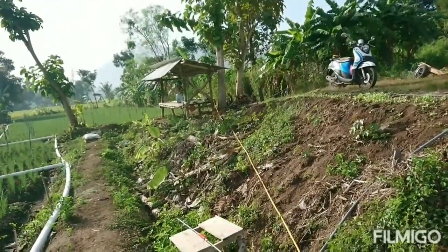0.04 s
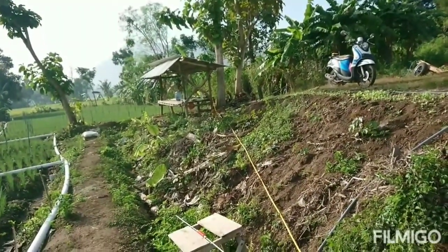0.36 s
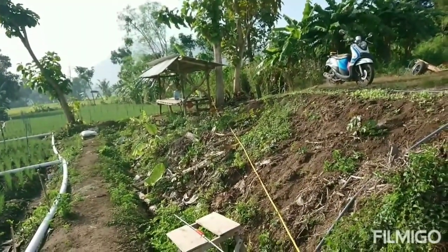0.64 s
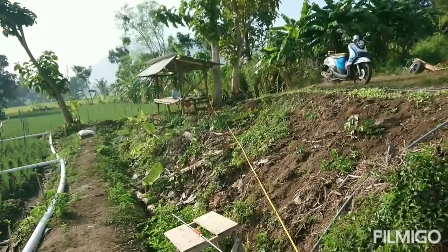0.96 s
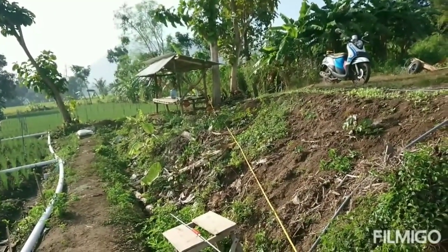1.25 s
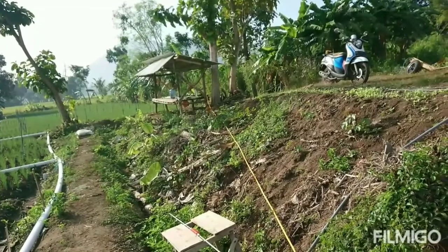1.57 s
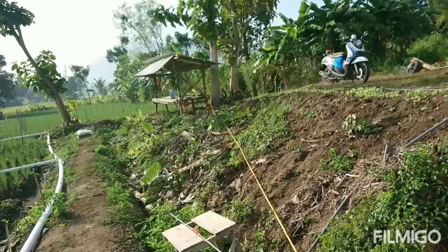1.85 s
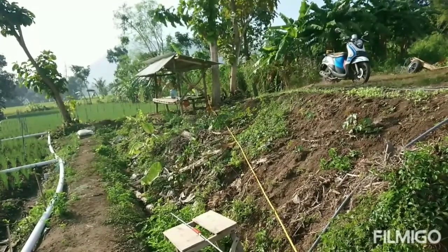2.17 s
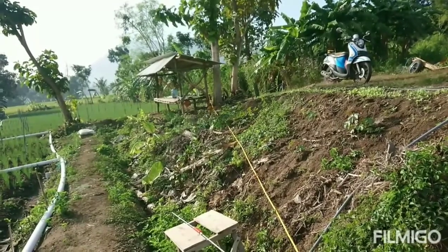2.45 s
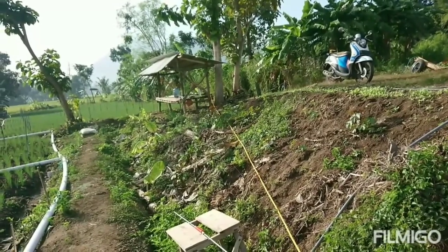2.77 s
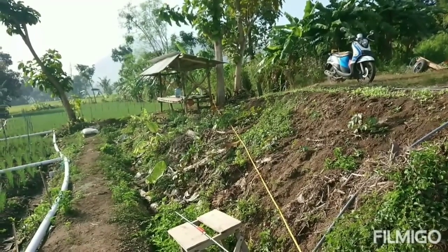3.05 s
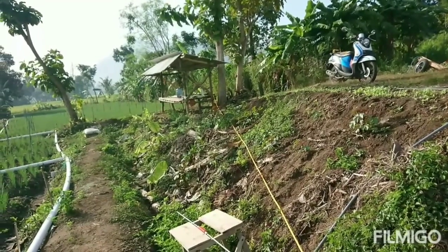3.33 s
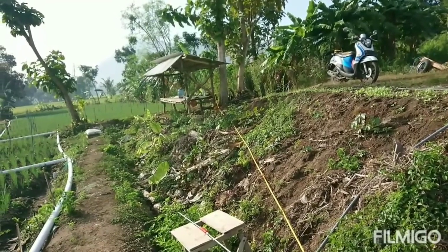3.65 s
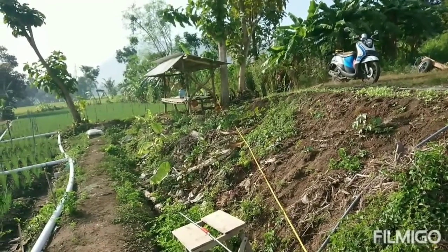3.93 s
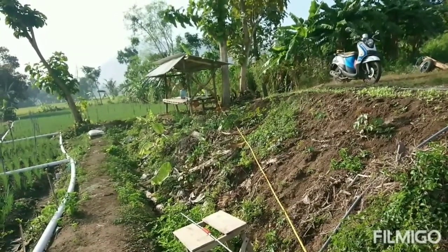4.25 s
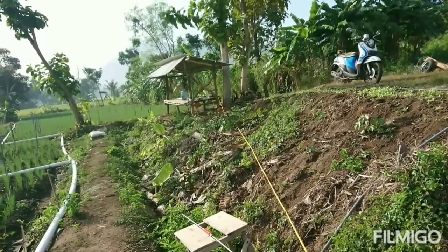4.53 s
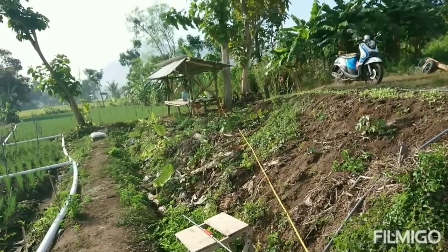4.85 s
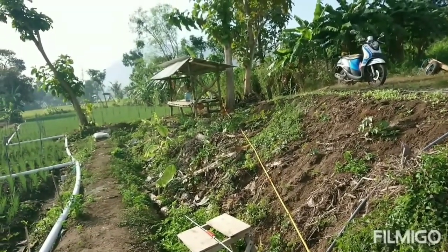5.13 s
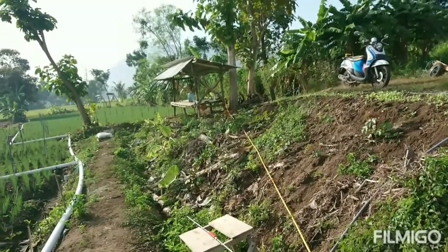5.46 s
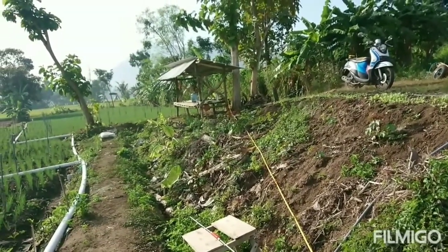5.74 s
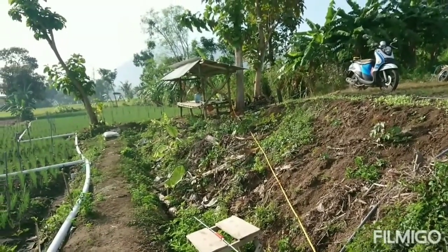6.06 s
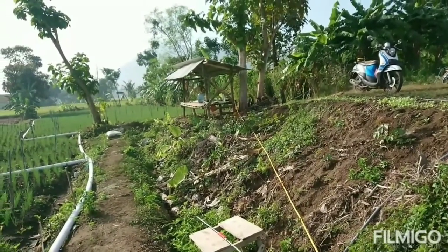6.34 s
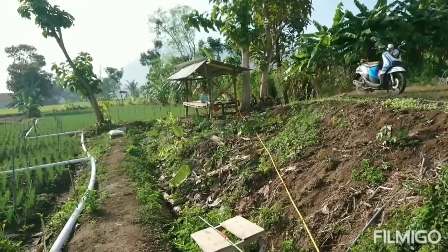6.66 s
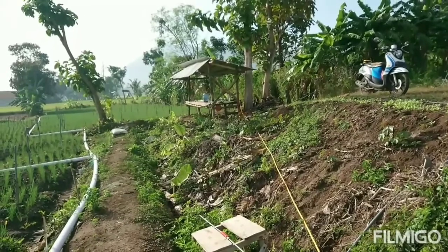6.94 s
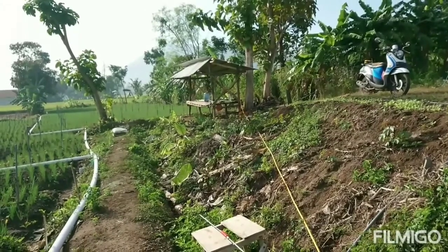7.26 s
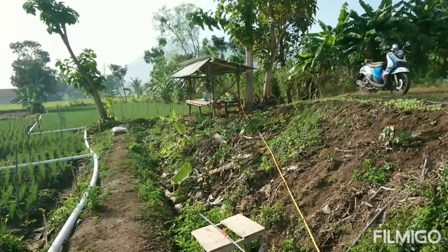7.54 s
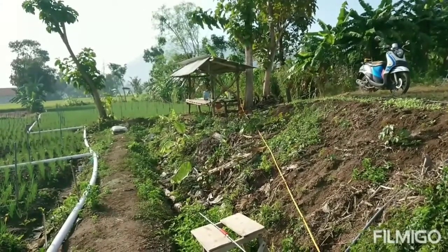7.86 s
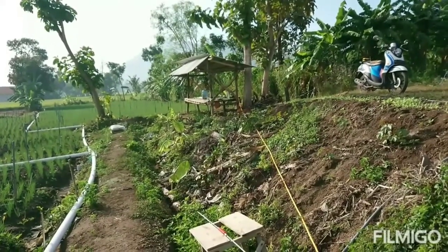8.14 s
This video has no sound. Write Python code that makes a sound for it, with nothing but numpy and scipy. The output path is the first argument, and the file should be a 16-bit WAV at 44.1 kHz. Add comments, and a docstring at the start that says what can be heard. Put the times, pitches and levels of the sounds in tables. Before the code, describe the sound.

A low outdoor rumble and a soft, even hiss run throughout, with distant birds giving short slurred whistles and tiny high chips. From about 0.5 seconds a small metal ratchet is worked close to the microphone: eight strokes, roughly 0.7 seconds apart, the last near 5.5 seconds. Each is a sharp click followed by the clack of the lever, a brief rattle and a thin, high buzz from the spring. The hardest clicks fall near 1.9 and 2.5 seconds. A steel catch snaps brightly on some strokes, loudest at 4.8 seconds. A faint, far engine hums from about 1.5 seconds. After another clack at 6 seconds, the slack lever taps, rubs and trembles quietly, the spring sings faintly, and an insect throbs far off. A light clack comes near 6.9 seconds and a small snap near 7.4, then faint trembling lasts until about 8.4 seconds.

```python
"""A small ratchet is worked close by at the edge of a rice field. From the start there is a low rumble,
an even hiss and distant birds; a far engine soon joins in. From 0.5 s come eight strokes, each a train
of impacts exciting damped resonances: the pawl clicks over a tooth, the lever falls back with a clack,
on some strokes a steel catch snaps, and the spring buzzes on. After 6 s an insect throbs far off, while
the slack lever taps and trembles and the freed spring sings."""
import sys
import numpy as np
from scipy import signal
from scipy.fft import rfft, irfft, next_fast_len
from scipy.io import wavfile
from scipy.ndimage import uniform_filter1d

SR = 44100
rng = np.random.default_rng(int(sys.argv[2]) if len(sys.argv) > 2 else 0)


def file_out(sig):
    """Save sig as 16-bit WAV at sys.argv[1]."""
    # one column per channel
    cols = np.atleast_2d(sig).T
    # limit, then scale
    lim = np.clip(cols, -1, 1)
    pcm = np.round(lim * 32767).astype(np.int16)
    wavfile.write(sys.argv[1], SR, pcm)


N = 366030
TIME = np.arange(N) / SR
HIT = SR // 2  # samples in the buffer of one impact
BOUNCE_S, RATTLE_BODY_DB = 0.013, -17  # delay of a rattle; offset of the housing's part in it
SPRING_HZ, SPRING_S = 10990, 0.12

# modes of the housing: (frequency [Hz], bandwidth [Hz], level [dB])
HOUSING_MODES = [(1237, 50, 5), (1316, 68, 1), (1420, 68, -7), (1516, 48.4, -1.5), (1840, 67, 0),
                 (1895, 65, 11), (2310, 45, 6), (3100, 58, -2), (3480, 90, -1.5), (4310, 60, -5)]
# spectrum of a click's contact noise: (frequency [Hz], level [dB])
CLICK_SPECTRUM = [(400, 1.5), (900, -3.5), (1700, -2), (3000, -26.5), (5000, 10.5), (10000, 3),
                  (12000, 6.5), (14300, 11.5), (16000, -25.5)]


def undb(db):
    """Amplitude ratio of a level in decibels."""
    return 10 ** (np.asarray(db) / 20)


def lookup(points, hz):
    """Interpolation of (frequency [Hz], value) points on a logarithmic frequency axis."""
    f, value = np.transpose(points)
    return np.interp(np.log(np.maximum(hz, 1)), np.log(f), value)


def unit(x, seconds):
    """Normalisation to rms 1 over the first seconds."""
    return x / np.sqrt(np.mean(x[..., :int(seconds * SR)] ** 2))


def add(out, s, x):
    """Superposition: x is added to out from time s on."""
    i = max(int(s * SR), 0)
    out[:, i:i + x.shape[-1]] += x[..., :N - i]


def walk(rate, size=N):
    """Smoothed random modulation with rate new values a second and a spread near 1."""
    k = max(int(SR / rate), 1)
    return 1.098 * uniform_filter1d(np.repeat(rng.standard_normal(size // k + 1), k), k)[:size]


def colour(x, points, size=512):
    """Minimum-phase filter with the response (frequency [Hz], gain [dB]), by cepstral folding."""
    cepstrum = irfft(np.log(undb(lookup(points, np.fft.rfftfreq(size, 1 / SR)))))
    cepstrum[1:size // 2] *= 2
    cepstrum[size // 2 + 1:] = 0
    response = irfft(np.exp(rfft(cepstrum)))
    return signal.fftconvolve(x, response[None], axes=1)[:, :x.shape[1]]


def ring(x, modes, spread_db=0, detune=0):
    """Modal superposition: striking point and load vary the weights and pitch of damped modes at random."""
    stretch = 1 + np.clip(detune * rng.standard_normal(), -.1, .1)
    offsets_db = spread_db * rng.standard_normal(len(modes))
    return sum(undb(db + offset) * signal.lfilter(*signal.iirpeak(hz * stretch, hz / width, fs=SR), x)
               for (hz, width, db), offset in zip(modes, offsets_db))


def contact(t60, rise, coherence):
    """Many tiny collisions sum to exponentially decaying noise, partly coherent between the channels."""
    t = np.arange(HIT) / SR
    shared = np.sqrt(coherence) * rng.standard_normal(HIT)
    diffuse = np.sqrt(1 - coherence) * rng.standard_normal((2, HIT))
    return (shared + diffuse) * np.minimum(t / rise, 1) * undb(-60 * t / t60)


def air_levels():
    """Level envelopes [dB] of the background's rumble, middle, hiss and top band."""
    # slow course of the rumble and of the middle: (time [s], level [dB])
    rumble = [(0, -1), (4.1, 0.5), (4.7, -1), (6.3, -2), (7.5, -1.5), (8.1, 2)]
    middle = [(0, 1), (2, 3), (5.8, 0.5), (6.3, -1.5), (7.6, -3.5), (8.3, -1)]
    # brief dips of the middle: (time [s], duration [s], level [dB])
    dips = [(5.24, 0.11, -14), (5.32, 0.083, -14), (6.085, 0.096, -6), (6.156, 0.11, -15),
            (6.27, 0.076, -7), (6.38, 0.075, -7), (7.077, 0.066, -5.5), (7.17, 0.1685, -9),
            (7.367, 0.17, -4), (7.556, 0.12, -6), (7.685, 0.085, -4), (7.845, 0.044, -2)]
    # course of the treble: (time [s], hiss level [dB], top level [dB])
    treble = [(0.0, -61.5, -69), (1.2, -64, -70), (1.57, -62, -69), (4.51, -63, -68.5), (4.76, -62, -65),
              (5.18, -64, -76), (5.69, -60.5, -68), (6.06, -67.5, -99), (6.26, -62, -80),
              (6.38, -61, -71.5), (6.75, -69.5, -105), (7.2, -65, -91), (7.5, -62.5, -76),
              (7.86, -68.5, -102), (8.3, -68.5, -93)]
    hiss_ref_db, top_ref_db = -64, -72.5
    rumble_db = np.interp(TIME, *np.transpose(rumble))
    middle_db = np.interp(TIME, *np.transpose(middle))
    for s, length, db in dips:
        add(middle_db[None], s, db * signal.windows.tukey(int(length * SR), .5))
    times, hiss, top = np.transpose(treble)
    hiss_db = np.interp(TIME, times, hiss) - hiss_ref_db
    top_db = np.interp(TIME, times, top) - top_ref_db
    return rumble_db, middle_db, hiss_db, top_db


def air():
    """Partly coherent noise: rumble alike on both sides and diffuse hiss, modulated band by band."""
    # outdoor noise: (frequency [Hz], spectral density [dB/Hz])
    density = [(20, -111), (35, -82), (56, -67.5), (85, -69.5), (120, -77.5), (170, -79.5), (280, -87.5),
               (400, -95.5), (600, -103), (900, -99), (1300, -99), (1900, -103), (3600, -96.5),
               (7500, -98.5), (10500, -102), (12000, -106), (14500, -105), (16000, -118)]
    # its balance: (frequency [Hz], left minus right [dB])
    balance = [(60, 3.5), (250, 4.5), (500, 7), (900, 5), (1300, -0.5), (2700, -4), (4000, -1), (6500, 0),
               (9000, 5.5), (13000, -1.5)]
    size = next_fast_len(N)
    hz = np.fft.rfftfreq(size, 1 / SR)
    coherence = lookup([(250, 0.918), (600, 0.18), (1200, 0.63), (2500, 0.24), (8000, 0.017)], hz)
    noise = rfft(rng.standard_normal((3, size)))
    pan = undb(lookup(balance, hz) * np.array([[.5], [-.5]]))
    shared = noise[2] * np.exp(-2j * np.pi * hz * np.array([[.00014], [0]]))  # arrives later on the left
    white = np.sqrt(coherence) * shared + np.sqrt(1 - coherence) * noise[:2]
    spectrum = white * pan * undb(lookup(density, hz) - 3) * np.sqrt(SR / 2)
    rumble_db, middle_db, hiss_db, top_db = air_levels()
    centres = [40, 80, 160, 280, 430, 580, 780, 1020, 1320, 1680, 2120, 2700, 3500, 5500, 8000,
               11000, 12500]
    # how strongly a band follows each level change: (frequency [Hz], slope [dB/dB])
    middle_slope = [(160, 0.11), (430, 0.6), (650, 2), (1000, 1.7), (1500, 1.1), (2300, 0.75), (4500, 0)]
    hiss_slope = [(1280, 0.262), (2560, 1.213), (5120, 1.03), (10240, 1.76)]
    flicker_slope = [(2300, 0.4), (3500, 0.58), (8000, 0.39), (12500, 0.46)]
    out = 0
    for centre, weights in zip(centres, np.eye(len(centres))):
        band = irfft(spectrum * lookup(np.transpose([centres, weights]), hz), size)[:, :N]
        db = middle_db * lookup(middle_slope, centre) + rumble_db * (centre < 100)
        db += top_db if centre == centres[-1] else hiss_db * lookup(hiss_slope, centre)
        # a band flickers more as its level shifts, above all where the middle thins
        flicker_db = lookup([(100, 1.33), (1000, 1.44), (5000, 2.02)], centre)
        flicker_db += 0.077 * abs(db) * lookup(flicker_slope, centre)
        flicker_db += 1.46 * np.clip(-middle_db, 0, 2) * (500 < centre < 3000)
        out = out + band * undb(db + flicker_db * walk(16))
    return out


def drones():
    """Random frequency and amplitude modulation broadens the tones of a far engine and an insect."""
    # (time [s], duration [s], frequency [Hz], bandwidth [Hz], flutter [dB], level [dB])
    far_tones = [(1.4, 1.86, 175, 6.3, 1, -68), (1.5, 1.35, 212, 10, 0.5, -72),
                 (2.852, 1.06, 230.6, 13.4, 2, -62.5), (3.4, 1.08, 159.9, 9.01, 0.5, -58),
                 (3.421, 4.454, 430.2, 85, 1.5, -77.5), (3.5, 6, 156.7, 9, 1, -70),
                 (4.198, 0.24, 1611, 39, 4, -73), (4.932, 0.23, 1730, 35, 4, -78),
                 (6.101, 2.8, 4300, 62, 2, -78)]
    pan = np.array([[1.15], [.85]])
    out = np.zeros((2, N))
    for s, length, hz, width, flutter_db, db in far_tones:
        n = int(length * SR)
        phase = 2 * np.pi * np.cumsum(hz + .5 * width * walk(2 * width)[:n]) / SR
        tone = np.sin(phase) * undb(flutter_db * walk(18)[:n]) * signal.windows.tukey(n, .7)
        add(out, s, undb(db + 2.5) * tone * pan)
    return out


def whistle(hz, db):
    """A frequency-modulated sine: one note that wavers and flutters along a pitch path."""
    u = np.linspace(0, 1, len(hz))
    waver = 1 + .012 * walk(300, size=len(u)) + .004 * walk(70, size=len(u))
    flutter = undb(2.2 * walk(90, size=len(u)) - 1)
    swell = np.sqrt(abs(np.sin(np.pi * u ** .85)))
    return undb(db) * flutter * swell * np.sin(2 * np.pi * np.cumsum(hz * waver) / SR)


def birds():
    """Scattering by trees smears the far whistles; nearer upward chips arrive dry, in pairs."""
    # slurs that flick up, then sag: (time [s], duration [s], top frequency [Hz], sag [Hz/s], level [dB])
    slurs = [(0.176, 0.085, 3200, 3750, -64), (0.414, .09, 4300, 3680, -61.5),
             (1.448, 0.099, 4300, 3740, -58), (1.656, 0.175, 4550, 2460, -60),
             (2.264, 0.13, 4670, 2800, -68), (2.775, 0.17, 4680, 3640, -59.5),
             (3.018, 0.12, 3270, 5060, -65.5), (3.22, 0.064, 3480, 3720, -62),
             (3.343, 0.085, 4540, 3705, -57), (3.55, 0.072, 2940, 3700, -66),
             (3.602, 0.157, 4073, 1697, -64), (3.73, 0.049, 3460, 3000, -65),
             (3.773, 0.23, 4680, 3720, -62), (5.248, 0.17, 4610, 3000, -65.5),
             (6.188, 0.12, 4630, 5050, -57.5), (6.876, 0.215, 4760, 2280, -64),
             (7.6, 0.22, 4740, 2490, -61.5), (8.175, 0.124, 4190, 3750, -72)]
    # rising notes: (time [s], starting frequency [Hz], level [dB])
    rises = [(.325, 3450, -64), (.855, 3927, -60), (6.62, 3340, -77), (7.24, 3410, -65), (7.865, 3180, -68)]
    # double chips of small birds: (time [s], level [dB])
    chips = [(.395, -67), (1.59, -71), (3.681, -67.5), (4.464, -66.5), (4.976, -68.5), (5.19, -67),
             (5.962, -69.5), (6.634, -68), (7.1, -70.5), (7.15, -67.5), (7.515, -68), (7.83, -70.5),
             (7.955, -66)]
    flick_hz, flick_s, rise_hz, rise_s = 520, .009, 482, 0.067
    far, near = np.zeros((2, 2, N))
    for s, length, top_hz, sag, db in slurs:
        t = TIME[:int(length * SR)]
        add(far, s, whistle(top_hz - sag * t - flick_hz * np.exp(-t / flick_s), db))
    for when, height in rng.random((12, 2)):  # scattered slurs of farther birds
        hz = np.interp(height, [0, 1], [2800, 4700]) - 3000 * TIME[:int(.08 * SR)]
        add(far, when * (N - HIT) / SR, whistle(hz, db=-70))
    climb_hz = rise_hz * np.sin(np.pi * .62 * np.linspace(0, 1, int(rise_s * SR)))
    for s, start_hz, db in rises:
        add(far, s, whistle(start_hz + climb_hz, db))
    u = np.linspace(0, 1, int(0.0073 * SR))
    faint_chips = [(s, -72.5) for s in rng.uniform(0, (N - HIT) / SR, size=22)]
    for s, db in list(chips) + faint_chips:
        hz = 7750 * (1 + 0.03 * rng.standard_normal())
        for lag, ratio, gain_db in [(0, 0.94, 11), (rng.uniform(.014, .028), 0.95, 11.5)]:
            phase = 2 * np.pi * np.cumsum(hz * ratio * (1 + 0.15 * (u - .5))) / SR
            add(near, s + lag - .002, undb(db + gain_db) * np.sin(np.pi * u) * np.sin(phase))
    trees = contact(t60=.15, rise=.004, coherence=0)
    scattered = signal.fftconvolve(far, trees / np.sqrt(np.sum(trees ** 2)), axes=1)[:, :N]
    return near + .66 * far + .8 * scattered


def shiver(length, hz, db, width_hz=130, fade_db=13):
    """Narrow-band resonance: small contacts keep thin steel ringing in a high, beating tone."""
    n = int(length * SR)
    tone = ring(rng.standard_normal((2, n + HIT // 8)), [(hz, width_hz, 0)])
    tone = ring(tone, [(hz, 4 * width_hz, 0)])[:, -n:]
    envelope = signal.windows.tukey(n, .25) * undb(-fade_db * np.linspace(0, 1, n))
    return undb(db) * unit(tone * envelope, length)


def rattle(crack_db, housing_db, top_db=2.5, decay_s=0.033):
    """Inelastic bounces of loose parts make a fading, uneven chatter that excites the housing."""
    t = np.arange(HIT) / SR
    bounces = undb(2.5 * walk(450, size=HIT))
    envelope = np.minimum(t / 0.003, 1) * np.exp(-(t / decay_s) ** 0.88)
    chatter = rng.standard_normal((2, HIT)) * bounces * envelope
    scrape = colour(chatter, [(400, 6.5), (1000, -5.5), (3800, 2), (7500, 0.5), (10000, -2),
                              (14000, top_db), (16000, -15.5)])
    body = unit(ring(chatter, HOUSING_MODES, spread_db=4, detune=0.004), 2 * decay_s)
    return undb(crack_db + 4) * unit(scrape, 0.57 * decay_s) + undb(housing_db + 5) * body


def thump(push_s):
    """Impulse response: a short push sets the grip swinging in its low modes."""
    # (frequency [Hz], bandwidth [Hz], level [dB])
    grip_modes = [(347, 57, 6), (432, 28.5, -6.5)]
    t = np.arange(HIT) / SR
    return unit(ring(t * np.exp(-t / push_s), grip_modes), 0.0032)


def friction(length, modes):
    """Stick-slip friction: noise of uneven strength keeps a set of modes ringing; rms 1."""
    n = int(length * SR)
    noise = rng.standard_normal((3, HIT))
    slips = (noise[2] + 0.93 * noise[:2]) * undb(4.5 * walk(100, size=HIT))
    scrape = colour(ring(slips, modes, spread_db=3.5), [(700, -19), (1100, 2), (4000, 2), (9000, -11)])
    return unit(scrape[:, :n] * signal.windows.tukey(n, .4), length)


def easing():
    """Frictional excitation: the eased lever rubs and trembles on the housing; the freed spring sings."""
    # rubs and light trembles of the lever: (time [s], duration [s], level [dB])
    rubs = [(3.908, 0.03, -58.5), (5.755, 0.0285, -57), (6.266, 0.026, -67.5), (7.466, 0.045, -63),
            (7.512, 0.03, -70)]
    trembles = [(6.599, 0.31, -81), (6.971, 0.14, -76.5), (7.159, 0.129, -68), (7.521, 0.29, -79.5),
                (7.881, 0.49, -71)]
    # the modes that each excites: (frequency [Hz], bandwidth [Hz], level [dB])
    rub_modes = [(1270, 133, 0.5), (1410, 120, 5), (1864, 140, 1.5), (2490, 110, 0), (2770, 180, -7),
                 (3650, 300, -6)]
    tremble_modes = [(1202, 49, 4), (1529, 39, -6.5), (1913, 43, 9.5), (2315, 39, -6.5), (2794, 46, -6),
                     (3680, 200, -4.5)]
    # (time [s], duration [s], frequency [Hz], level [dB])
    spring_tones = [(5.717, 0.14, 10980, -61), (6.937, 0.58, 10800, -72.5), (7.368, 0.11, 10800, -61),
                    (7.916, 0.35, 10970, -79.5)]
    out = np.zeros((2, N))
    for touches, modes in [(rubs, rub_modes), (trembles, tremble_modes)]:
        for s, length, db in touches:
            add(out, s, undb(db) * friction(length, modes))
    for s, length, hz, db in spring_tones:
        add(out, s, shiver(length, hz, db, width_hz=17, fade_db=4))
    return out


def pings():
    """Damped oscillators: single loose parts tick and ring, each at its own natural frequency; the last row is
    the slack lever ringing on in its low mode near 1.16 kHz."""
    # (time [s], frequency [Hz], bandwidth [Hz], t60 [s], level [dB])
    ringing_parts = [(0.608, 13600, 300, .04, -61), (1.308, 4900, 500, .04, -50),
                     (1.5035, 10000, 8000, .006, -52), (1.913, 6300, 900, .015, -45),
                     (1.992, 13700, 400, .07, -53), (5.407, 7500, 6000, 0.0087, -51),
                     (5.556, 13600, 200, .16, -56.5), (5.668, 7800, 120, 0.12, -53),
                     (6.585, 1165, 18, .6, -68)]
    out = np.zeros((2, N))
    for s, hz, width, t60, db in ringing_parts:
        tone = ring(contact(t60, rise=.001, coherence=.3), [(hz, width, 0)])
        add(out, s, undb(db) * unit(tone, t60 / 4))
    return out


def lever_taps():
    """Free vibration: the slack lever taps and chatters in its play, ringing in its own modes."""
    # (time [s], level [dB], t60 [s])
    taps = [(6.349, -54.5, 0.1), (6.383, -69, 0.9), (6.462, -57.5, 0.3), (6.531, -57.5, 0.1),
            (6.554, -55.5, 0.28), (6.59, -57, 0.23), (6.955, -66, 0.44)]
    # the unloaded lever: (frequency [Hz], bandwidth [Hz], level [dB])
    lever_modes = [(1156, 15, 9), (1825, 43, 6), (2190, 46, -3), (2650, 110, 3), (2900, 59, -8),
                   (3150, 18, 11), (3600, 136, -3.5), (3800, 78, 0)]
    out = np.zeros((2, N))
    for s, db, t60 in taps:
        blow = contact(t60, rise=0.0011, coherence=0.44)
        chatter = undb(-17 + 3.06 * walk(181, size=HIT)) * contact(.2, rise=0.004, coherence=0.57)
        crack = colour(blow, [(400, 8), (800, -11.5), (2500, 6), (3800, 0), (7000, 2), (11000, -13),
                              (14000, -34)])
        lever = ring(blow + chatter, lever_modes)
        add(out, s, undb(db - 1) * unit(lever, 0.0166) + undb(db - 7) * unit(crack, 0.012))
    return out


def catch_snaps():
    """Sudden release: the catch slips and lets go, exciting steel, housing, loose parts and spring."""
    # (time [s], steel level [dB], housing level [dB], t60 of the clink [s], spring level [dB])
    snaps = [(0.704, -40, -53, 0.063, -68), (0.903, -54, -66.5, 0.072, -80), (4.083, -50, -48, 0.04, -61),
             (4.8197, -25, -39.5, 0.022, -45), (4.899, -48.5, -50, 0.12, -70), (5.653, -37, -50, 0.04, -62),
             (5.663, -43, -62, 0.039, -74), (5.714, -47.5, -49.5, 0.042, -56),
             (7.328, -59, -52, 0.042, -78), (7.3619, -44.5, -51.5, 0.038, -63)]
    # the catch's high ring and lower clink: (frequency [Hz], bandwidth [Hz], level [dB])
    steel_modes = [(5690, 230, 6.5), (6570, 420, 4.5), (7590, 220, 15), (8050, 200, 5.5), (8950, 300, 0),
                   (10200, 270, -18.5), (10750, 57, 5.5), (13900, 400, 4.5)]
    clink_modes = [(3240, 100, 3.5), (3564, 110, 5), (4230, 49, 4.5), (4300, 210, -8)]
    out = np.zeros((2, N))
    for s, steel_db, housing_db, t60, spring_db in snaps:
        strike = contact(1.2 * t60, rise=0.00034, coherence=0.47)
        steel = ring(strike, steel_modes, spread_db=1.5, detune=.002)
        steel += undb(-20) * colour(strike, CLICK_SPECTRUM)
        clink = ring(contact(t60, rise=.001, coherence=.2), clink_modes, spread_db=2, detune=.01)
        blow = contact(1.36 * t60, rise=0.00048, coherence=0.61)
        knock = ring(blow, HOUSING_MODES, spread_db=4, detune=.002)
        slip = ring(contact(0.0137, rise=0.001, coherence=0.17), steel_modes)
        add(out, s - .003, undb(steel_db - 13) * unit(slip, .003))
        add(out, s, undb(steel_db + 2.5) * unit(steel, .0036))
        add(out, s, undb(0.44 * steel_db - 30.5) * unit(clink, .002))  # grows more slowly than the steel
        add(out, s, undb(housing_db - 3) * unit(knock, 0.016))
        add(out, s + BOUNCE_S, rattle(steel_db - 31, steel_db - 31 + RATTLE_BODY_DB))
        add(out, s, shiver(0.5 * SPRING_S, SPRING_HZ, spring_db, fade_db=31))
    return out


def lever_clacks():
    """Impact and rebound: the lever brushes and hits its stop; housing, loose parts and spring respond."""
    # (time [s], crack level [dB], housing level [dB], t60 [s], rattle level [dB], spring level [dB])
    clacks = [(0.735, -41.5, -42, 0.069, -61, -74), (0.784, -44.5, -42, 0.077, -56, -66),
              (1.413, -49.5, -43.5, 0.041, -56.5, -70), (1.445, -58, -49, 0.054, -65, -66),
              (1.9902, -45.5, -39.5, 0.075, -54, -64), (2.617, -48.5, -43, 0.03, -60, -73),
              (3.326, -48, -43, 0.057, -60, -63.5), (4.126, -48, -41, 0.13, -53.5, -59),
              (4.862, -49.5, -43.5, 0.062, -54.5, -63), (5.116, -62, -58.5, 0.0295, -86, -85),
              (5.7745, -50, -44, 0.087, -58.5, -69), (5.99, -47.5, -40.5, 0.032, -66.5, -72),
              (6.939, -52.5, -50.5, 0.057, -68, -75), (7.364, -49, -52.5, 0.084, -85, -85)]
    # contact noise: (frequency [Hz], level [dB])
    crack_spectrum = [(100, -6), (350, -3), (700, -7), (2500, -3.5), (3600, 8), (4500, 3.5), (6000, 3),
                      (9000, -6), (14000, -2), (16000, -45)]
    # dry knock of lever on stop: (frequency [Hz], bandwidth [Hz], level [dB])
    knock_modes = [(1335, 370, 0.17), (1900, 500, 1.5)]
    out = np.zeros((2, N))
    for s, crack_db, housing_db, t60, rattle_db, spring_db in clacks:
        crack = colour(contact(t60, rise=.002, coherence=.2), crack_spectrum)
        blow = contact(0.028, rise=0.00045, coherence=0.94)
        blow += undb(-7.5) * contact(t60, rise=0.0078, coherence=0.88)
        knock = unit(ring(contact(0.039, rise=0.0017, coherence=0.97), knock_modes), 0.0082)
        body = unit(ring(blow, HOUSING_MODES, spread_db=0.5, detune=0.0018), 0.014)
        brush = ring(contact(0.05, rise=0.0066, coherence=0.306), knock_modes)
        housing = undb(-5) * knock + undb(-2.5) * body + undb(-14) * thump(0.00034)
        add(out, s - .012, undb(housing_db - 16.5) * unit(brush, .012))
        add(out, s, undb(crack_db - 3) * unit(crack, 0.015) + undb(housing_db) * housing)
        add(out, s + BOUNCE_S, rattle(rattle_db, rattle_db + RATTLE_BODY_DB + 5, top_db=-6))
        add(out, s, shiver(SPRING_S, SPRING_HZ, spring_db))
    return out


def pawl_crack(crack_db, ring_db, t60):
    """A hard impact excites high modes: the harder the pawl drops, the more the tooth itself rings."""
    # (frequency [Hz], bandwidth [Hz], level [dB])
    tooth_modes = [(8800, 520, 4), (9550, 450, -1)]
    pawl_modes = [(4520, 730, 6), (6800, 350, 0.5), (10800, 167, 1), (12700, 600, -9), (13600, 400, 15.5)]
    blow = contact(t60, rise=0.0012, coherence=0.2)
    blow[:, int(.001 * SR)] += undb(13.5)  # the hard instant of contact
    tooth = undb(0.96 * (crack_db + 33.5)) * ring(blow, tooth_modes, spread_db=3, detune=0.0093)
    pawl = undb(ring_db) * ring(blow, pawl_modes, spread_db=2.5, detune=0.008)
    crack = tooth + pawl + undb(-8.5) * colour(blow, CLICK_SPECTRUM)
    return undb(crack_db - 4.5) * unit(crack, 0.0028)


def pawl_clicks():
    """Double impact: the pawl rides up a tooth, drops and seats, shaking housing, grip and loose parts."""
    # (time [s], seating delay [s], crack level [dB], seating re crack [dB], pawl ring within crack [dB],
    #  housing level [dB], thump level [dB], rattle delay [s], rattle level [dB])
    clicks = [(0.547, 0.011, -40, 1.5, -2, -46, -49, 0.028, -61.5),
              (1.2809, 0.0055, -33, -3, 3, -44, -40, 0.024, -57),
              (1.879, 0.0014, -19.5, -2.5, 2, -36.5, -29, 0.034, -53.5),
              (2.4676, 0.00089, -23.5, -1.5, 0.5, -35.5, -32, 0.044, -52.5),
              (3.144, 0.0016, -27.5, -2.5, -2, -40, -33, 0.021, -53),
              (3.926, 0.0033, -35, 2, -6, -44, -42, 0.012, -56),
              (4.683, 0.005, -33, 0, -2, -45, -37.5, 0.011, -55),
              (5.496, 0.014, -39, -2.5, -4, -46.5, -54.5, 0.0221, -64)]
    # under load the housing is damped to its low bending: (frequency [Hz], bandwidth [Hz], level [dB])
    loaded_modes = [(680, 370, -2.5), (1190, 170, 5.5), (2600, 1100, -3)]
    firm_t60_s, firm_db, doubling_db = 0.022, -25.5, 8
    lead = int(.02 * SR)
    out = np.zeros((2, N))
    for s, seat_s, crack_db, seat_db, ring_db, housing_db, thump_db, rattle_s, rattle_db in clicks:
        t60 = firm_t60_s * 2 ** ((firm_db - crack_db) / doubling_db)  # a soft click lingers
        tick = ring(contact(1.34 * t60, rise=0.000138, coherence=0.89), loaded_modes)
        add(out, s, pawl_crack(crack_db, ring_db, t60))
        add(out, s, undb(housing_db - 6) * unit(tick, 0.015) + undb(thump_db - 6.2) * thump(0.0002))
        add(out, s + seat_s, pawl_crack(crack_db + seat_db, ring_db, 0.914 * t60))
        add(out, s + rattle_s, rattle(rattle_db, rattle_db + RATTLE_BODY_DB))
        add(out, s + seat_s, shiver(0.022, hz=13600, db=rattle_db + ring_db - 3.5))  # the pawl rings on
        # the slide up the tooth swells just before the drop: a decay reversed in time
        slide = colour(contact(0.0144, rise=0.00021, coherence=0.18), CLICK_SPECTRUM)
        add(out, s + 0.00067 - lead / SR, undb(.5 * crack_db - 31.5) * unit(slide, 0.0031)[:, lead::-1])
    return out


def ratchet():
    """Direct sound plus diffuse reflection from an earth bank, placed by time and level differences."""
    # (frequency [Hz], left minus right [dB])
    balance = [(300, 3.5), (700, 5.5), (1300, -2.5), (2400, 3.5), (4400, 1.5), (6500, 1.5), (8000, 3),
               (10500, 6), (13000, -2.5)]
    direct = pawl_clicks() + lever_clacks() + catch_snaps() + pings() + lever_taps() + easing()
    direct[0] = np.roll(direct[0], 5)  # the path to the left is 5 samples longer
    bank = contact(0.19, rise=0.0079, coherence=0)
    bank = colour(bank, [(200, -5.5), (1500, -3), (5000, -12), (14000, -28)])
    bank /= np.sqrt(np.sum(bank ** 2) / 2)
    both = direct + undb(-18) * signal.fftconvolve(direct, bank, axes=1)[:, :N]
    # constant-power panning at each frequency
    left = [(hz, db - 10 * np.log10((1 + undb(2 * db)) / 2)) for hz, db in balance]
    right = [(hz, -10 * np.log10((1 + undb(2 * db)) / 2)) for hz, db in balance]
    return np.vstack([colour(both[:1], left), colour(both[1:], right)])


def scene():
    """Superposition of the near ratchet and the open field."""
    return ratchet() + air() + birds() + drones()


def record(dry):
    """Band limiting: a steep elliptic low-pass removes the highest treble."""
    cutoff_hz = 15800
    return signal.sosfilt(signal.ellip(10, .2, 75, cutoff_hz, fs=SR, output="sos"), dry)


dry = scene()
out = record(dry)
file_out(out)
```